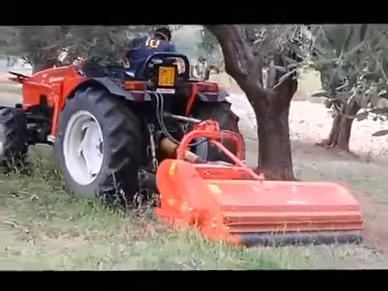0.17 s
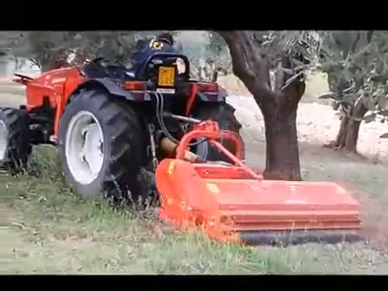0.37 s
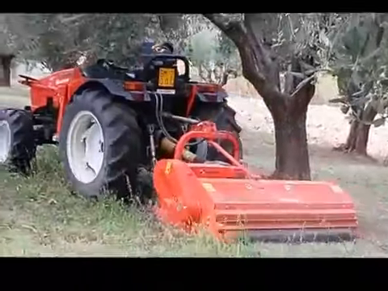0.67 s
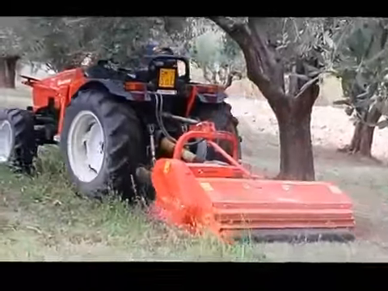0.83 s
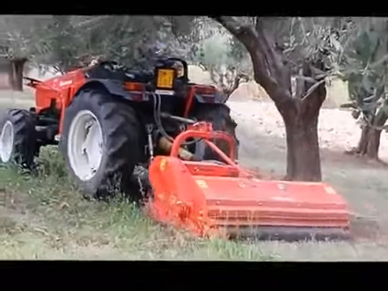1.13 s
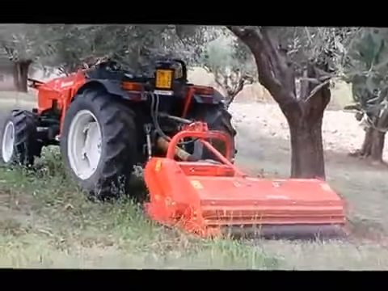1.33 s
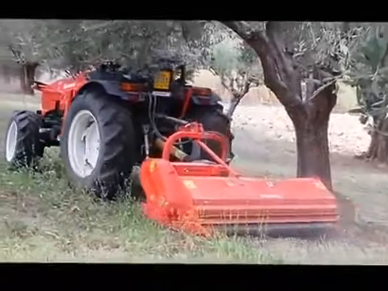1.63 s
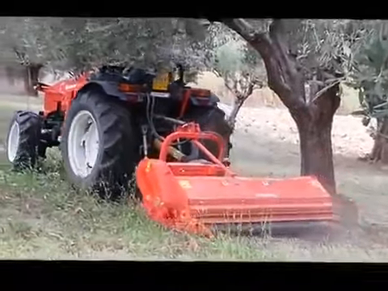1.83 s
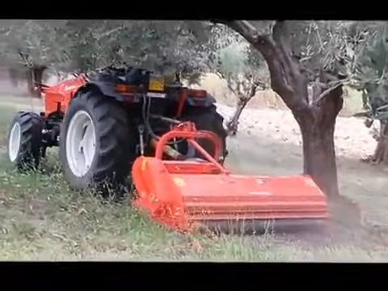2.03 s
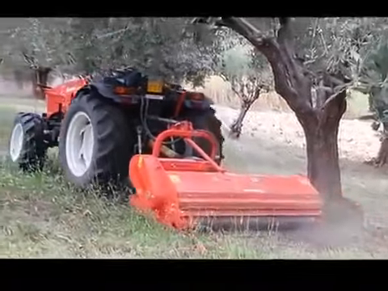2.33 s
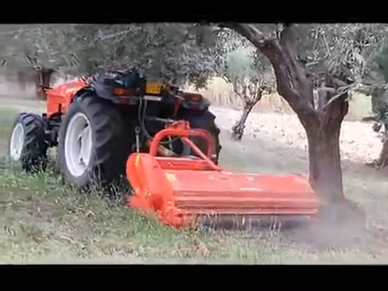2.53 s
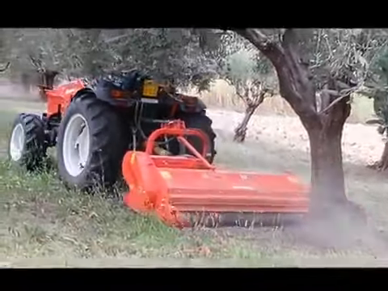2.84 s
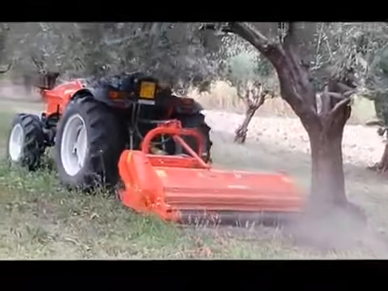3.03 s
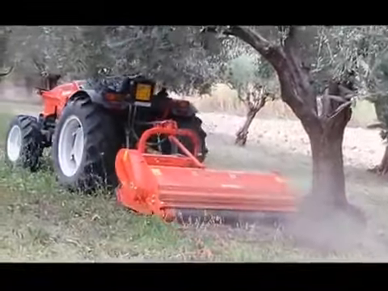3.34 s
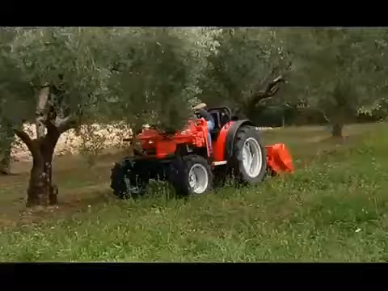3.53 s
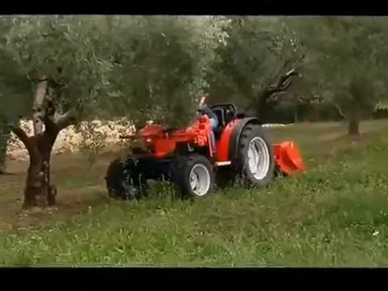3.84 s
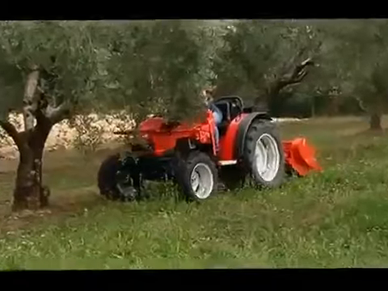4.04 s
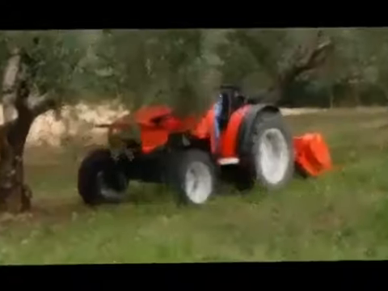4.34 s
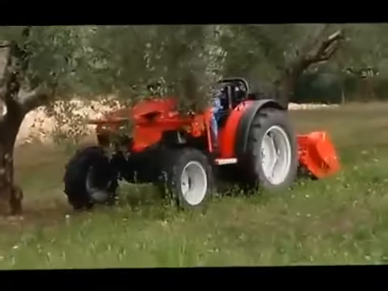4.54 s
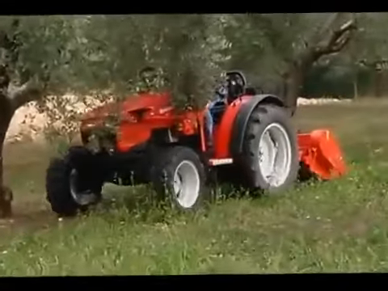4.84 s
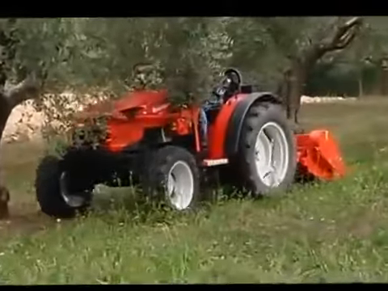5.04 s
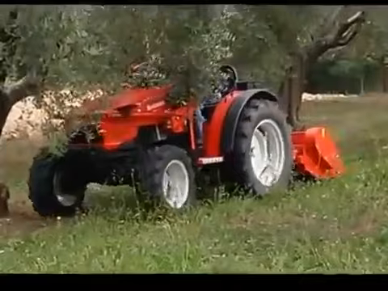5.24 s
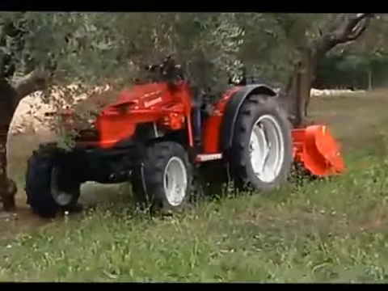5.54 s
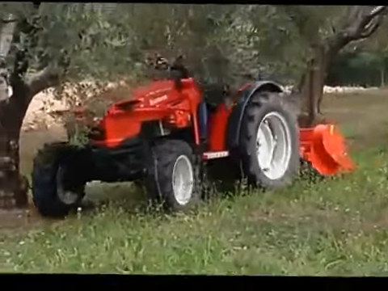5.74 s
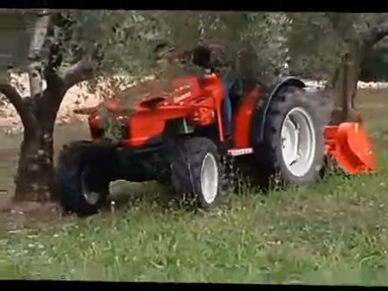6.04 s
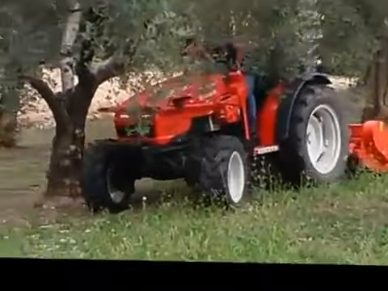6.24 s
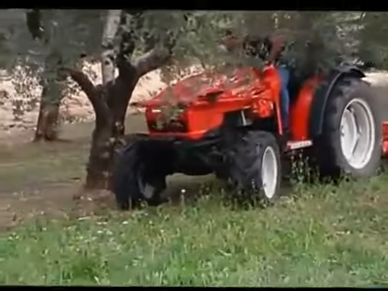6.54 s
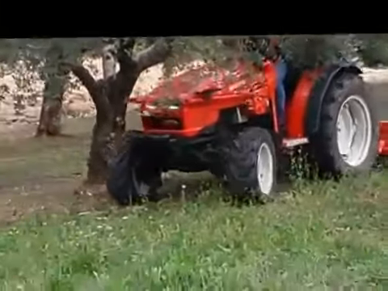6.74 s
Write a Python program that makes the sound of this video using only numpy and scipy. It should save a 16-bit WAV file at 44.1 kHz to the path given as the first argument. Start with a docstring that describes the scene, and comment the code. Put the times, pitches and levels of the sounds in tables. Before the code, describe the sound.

A flail mulcher works close by outdoors, pulled by a compact diesel tractor. From the start, grass and stalks shred in a rough, crackling hiss, with twigs snapping and chopped bits pattering against the steel hood. Underneath run a steady engine drone, a rotor hum and a fluttering gear whine. The shredding peaks around 2.5 seconds with a dull thump of earth and a sharp twig crack, then the whole sound sinks around 3 seconds and partly recovers. At 3.7 seconds it cuts to silence. At about 4.5 seconds the tractor is heard from the front: the diesel is nearest, droning and knocking at an even speed, with the mulcher a pulsing hiss behind it. It grows slightly louder as it approaches. Two small twigs snap near 5.3 seconds, and at about 6.8 seconds a dry branch cracks and splinters.

```python
"""Tractor and flail mulcher in an olive grove

A compact diesel pulls the mulcher through grass, heard from behind, then, after a short silence,
from the front. The four-cylinder engine drones and knocks, the rotor hums, its gears whine.
The flails shred stalks and fling the bits against the steel hood. Near 3 s the whole sound
sinks for a moment. A dry branch splinters at the end."""
import sys
import numpy as np
from scipy import signal
from scipy.fft import rfft, irfft, next_fast_len
from scipy.io import wavfile

SR = 44100
rng = np.random.default_rng(int(sys.argv[2]) if len(sys.argv) > 2 else 0)


def waveform_to_disk(signal):
    """Save audio, clipped to [-1, 1], as 16-bit WAV at the path in sys.argv[1]."""
    frames = np.transpose(np.atleast_2d(signal))
    scaled = np.clip(frames, -1, 1) * 32767
    samples = np.round(scaled).astype(np.int16)
    wavfile.write(sys.argv[1], SR, samples)


N = 303849
TIME = np.arange(N) / SR
REAR_END_S, FRONT_START_S = 3.718, 4.466
TEETH_PER_FIRING, ROTOR_BEATS_PER_FIRING = 3.538, 1.68
BURST_ATTACK_S = 0.0081

# engine speed (time [s], firing rate [Hz])
FRONT_FIRING_RATE = [(4.5, 58.38), (5.4, 58.33), (5.8, 58.17), (6.3, 58.24), (6.6, 58.45)]
# engine and driveline loudness (time [s], level [dB])
REAR_DRONE_LEVEL = [(0, -30.5), (.2, -29.5), (.57, -29.5), (.79, -26), (.84, -30.5), (1.9, -27),
                    (2.5, -27.5), (2.57, -33.5), (2.98, -39.5), (3.33, -40.5), (3.7, -34.5)]
# exhaust tones; quarter orders from unequal cylinders (multiple of firing rate, level [dB])
REAR_EXHAUST_ORDERS = [(0.998, -6.5), (2, -4), (3, -12), (4, -26), (4.25, -16), (5, -20)]
FRONT_EXHAUST_ORDERS = [(1, -3), (1.5, -23), (2.001, -5.5), (3, -26), (3.5, -19.5), (4.001, -15),
                        (4.249, -28)]
# gear whine (multiple of tooth rate, level [dB], roughness [0-1])
REAR_GEAR_ORDERS = [(3, -13, .7), (5, -13.5, .35), (6, -17, 1), (7, -19.5, 0.9), (8, -23, .7)]
FRONT_GEAR_ORDERS = [(3, -11.5, 0.68), (7, -18, .8), (10, -20, 0.79)]
# shredding loudness (time [s], level [dB])
SHREDDING_LEVEL = [(0, -33), (.17, -29.5), (.4, -23), (.6, -27), (.9, -23), (1.13, -21), (1.36, -21.5),
                   (1.66, -27), (1.73, -23), (1.93, -25), (2.15, -19), (2.35, -21.5), (2.5, -18.5),
                   (2.548, -22.5), (2.58, -21), (2.66, -23), (2.73, -28.5), (2.92, -35), (3.35, -39),
                   (3.5, -31.5), (3.64, -34.5), (3.71, -27)]

# source spectra (frequency [Hz], level [dB])
PUFF_SPECTRUM = [(20, -28.5), (50, -12.5), (85, 0.5), (130, -0.5), (240, -1.5), (300, -6), (380, -11.5),
                 (450, -19.5), (530, -15), (700, -11.5), (1500, -52.5)]
REAR_STALK_SPECTRUM = [(200, -21.5), (450, -12.5), (900, -24.5), (1880, -24.5), (2900, -9.5), (3440, -11),
                       (4170, -4), (5800, -9), (8120, -1.5), (9300, -10.5), (11100, -12), (13200, -19),
                       (14000, -20.5), (14600, -38), (15000, -37)]
FRONT_STALK_SPECTRUM = [(2060, -51), (3500, -39), (3770, -13), (4360, -9), (5530, -2.5), (6200, -0.5),
                        (6800, -2.5), (7870, -0.5), (8510, -4.5), (9560, -5.5), (11000, -15), (12700, -18),
                        (14100, -34), (14600, -68), (15000, -52)]
HOOD_SPECTRUM = [(300, -14), (390, -10), (450, -24), (530, -13.5), (600, -5.5), (700, -1.5), (830, -3.5),
                 (950, -5), (1130, -5.5), (1400, -2.5), (1650, -3), (1850, -3.5), (2200, -1.5), (3000, -6),
                 (3800, -18.5), (6000, -29)]
LUMP_SPECTRUM = [(200, -16.5), (450, -7.5), (700, 0.5), (1400, 0.5), (2500, -13.5), (5000, -33.5)]
BLOCK_SPECTRUM = [(300, -22), (420, -8), (600, -2), (720, -12), (840, 1), (930, -2.5), (1200, 3.5),
                  (1480, -2.5), (1680, 1.5), (2000, 1.5), (2400, -0.5), (3000, -3), (3800, -14),
                  (6000, -63)]
BRANCH_SPECTRUM = [(400, -27), (800, -7), (2300, -8), (3300, -1), (3900, -14), (4700, -8), (5700, 7),
                   (6300, 1.5), (7100, 5.5), (8500, -13), (12000, -19), (15000, -47)]
# hood panel and engine block resonances (frequency [Hz], half width [Hz], level [dB])
PANEL_RESONANCES = [(710, 25, -14.5), (825, 30, -14.5), (1405, 32, -19), (1607, 28, -14.5),
                    (2107, 190, -10.5), (2720, 160, -13)]
BLOCK_RESONANCES = [(719, 32, -8.5), (808, 48, -12), (1453, 69, -12.5), (1840, 160, -15),
                    (2040, 120, -16.5)]

# sticks and clods on the hood (time [s], level [dB])
CLOD_HITS = [(.24, -30.5), (.332, -26), (0.839, -25), (1.057, -24.5), (2.497, -25.5), (2.67, -31),
             (2.828, -30.5), (2.952, -30.5), (3.54, -52), (3.695, -44)]
# torn tufts (time [s], level [dB], centre [Hz], length [s])
TUFT_BURSTS = [(0.236, -21, 8190, 0.031), (0.33, -14, 4620, 0.019), (0.343, -17.5, 8200, 0.038),
               (0.406, -22.5, 7900, 0.031), (0.469, -19, 8200, 0.018), (0.489, -21, 8200, 0.032),
               (0.638, -24, 8200, 0.039), (0.68, -22, 7900, 0.034), (0.818, -20, 7600, 0.038),
               (0.843, -21, 6000, 0.049), (0.916, -20, 7800, 0.027), (1.043, -13, 4400, 0.02),
               (1.058, -17.5, 7600, 0.041), (1.155, -33, 7900, 0.015), (1.407, -17, 6470, 0.037),
               (1.601, -17.5, 4850, 0.031), (1.864, -23.5, 8000, 0.04), (1.947, -18.5, 4800, 0.027),
               (2.019, -21, 5000, 0.04), (2.065, -22, 7960, 0.035), (2.121, -21, 8200, 0.055),
               (2.191, -19, 7800, 0.021), (2.239, -16.5, 5000, 0.036), (2.269, -24.5, 5600, 0.034),
               (2.401, -21, 7410, 0.037), (2.453, -17, 4970, 0.025), (2.616, -21, 5000, 0.023),
               (2.671, -20.5, 5030, 0.019), (2.817, -22, 7140, 0.044), (2.936, -25.5, 4000, 0.019),
               (2.956, -28.5, 4560, 0.032), (3.034, -28.5, 9250, 0.033), (3.415, -29.5, 8480, 0.054),
               (3.698, -16.5, 7200, 0.019)]
# twigs (time [s], level [dB], centre [Hz], t60 [s], crack gain, left minus right [dB])
TWIG_SNAPS = [(0.237, -19, 4930, 0.047, .2, 5), (0.3313, -15, 4540, 0.031, 0.72, 4),
              (.496, -11.5, 8000, .035, .3, -4), (.848, -21, 6000, .025, .6, -2),
              (1.433, -19, 5000, 0.023, .4, 6), (1.616, -29, 4660, 0.029, .5, -1),
              (2.231, -13, 4400, 0.034, .3, 9), (2.275, -15.5, 5530, .035, .6, 6),
              (2.556, -8.5, 4900, .06, .7, 4.5), (2.622, -18, 5060, .03, .5, 9),
              (2.675, -24, 5000, .035, 0.55, 7), (2.834, -20.5, 5170, 0.082, .3, 8),
              (2.961, -23, 4600, 0.038, .5, 5), (3.108, -34, 6040, .03, .5, 5),
              (3.544, -39, 4500, .05, .5, 0), (5.248, -20, 6000, 0.024, .2, 1),
              (5.336, -21, 8200, .025, .3, -11)]
# grit on steel (time [s], frequency [Hz], level [dB], t60 [s])
GRIT_PINGS = [(1.503, 7520, -18, 0.12), (1.517, 7030, -20, .15), (3.545, 1960, -24, 0.17),
              (3.545, 2760, -36, 0.12), (3.545, 4530, -27.5, 0.2), (3.545, 5570, -30.5, 0.17)]

# ring of a cylinder's knock (frequency [Hz], level [dB], t60 [s])
KNOCK_RINGS = [(1365, -19.5, 0.042), (1487, -16, 0.033), (1883, -11, 0.032), (2033, -11.5, 0.063),
               (2286, -17, 0.051)]
# knock per cylinder, in firing order (level [dB])
CYLINDER_DB = [0, -7.5, -5, -6]
# accented knocks of the first cylinder (time [s], level above usual [dB])
KNOCK_ACCENTS = [(4.577, 7), (4.645, 5), (4.785, 9), (5.194, 2), (5.334, 5), (5.402, -1), (5.538, 4),
                 (5.677, 8), (5.814, 7), (6.02, 5.5), (6.089, 7), (6.225, 5.5), (6.434, 8), (6.499, 4),
                 (6.57, 6)]

# stereo width (frequency [Hz], side minus mid [dB])
REAR_SIDE = [(100, -11), (400, -8.5), (1200, -5.5), (2200, -8), (3400, 3), (4500, -0.5), (5600, 0.5),
             (8000, 1), (14000, -1)]
FRONT_SIDE = [(100, -23), (700, -8.5), (2700, -20.5), (3500, 1), (5000, 0), (14000, 0)]
# stereo balance (frequency [Hz], left minus right [dB])
REAR_BALANCE = [(1800, 0), (3200, -5), (4100, 3.5), (5000, 6), (6200, 8), (7000, -4), (8000, -5.5),
                (9700, -7.5), (11000, -8.5), (13000, -9), (14500, -2.5)]
FRONT_BALANCE = [(3600, -1), (4400, 9.5), (5000, 7), (6200, 6), (6900, 0.5), (7700, -18.5), (8200, -16),
                 (10200, -4), (11000, -8.5), (13000, -23.5)]


def from_db(db):
    """Decibels to gain."""
    return 10 ** (np.asarray(db) / 20)


def unit_rms(x):
    """Scale to rms 1."""
    return x / np.sqrt(np.mean(x ** 2) + 1e-20)


def since(start_s):
    """Seconds since start_s, zero before."""
    return np.maximum(TIME - start_s, 0)


def curve(points):
    """A (time, value) table at every sample."""
    return np.interp(TIME, *np.transpose(points))


def colour(x, spectrum):
    """Filter by a (frequency, level) table."""
    size = next_fast_len(N, True)
    hz, db = np.transpose(spectrum)
    bins_hz = np.maximum(np.arange(size // 2 + 1) * SR / size, 1)
    gain = from_db(np.interp(np.log(bins_hz), np.log(hz), db))
    return irfft(rfft(x, size) * gain, size)[..., :N]


def drift(rate_hz):
    """Slow random wander, rms 1."""
    hop = 40
    pole = np.exp(-2 * np.pi * hop * rate_hz / SR)
    noise = rng.standard_normal(N // hop + 2002)
    slow = signal.lfilter([1], [1, -2 * pole, pole * pole], noise)[2000:]
    return np.interp(np.arange(N) / hop, np.arange(len(slow)), unit_rms(slow))


def grains(per_s, spread_db):
    """Two streams of random, uneven clicks, rms 1."""
    onsets = rng.random((2, N)) < per_s / SR
    sizes = from_db(spread_db * np.minimum(rng.exponential(1, (2, N)), 5))
    return unit_rms(onsets * sizes * rng.choice([-1, 1], (2, N)))


def to_stereo(pair, spectrum, width, balance):
    """Colour two streams as mid and side; return left and right, mid rms 1."""
    mid, side = colour(pair, spectrum)
    side = colour(side, width)
    left = colour(mid + side, [(hz, db / 2) for hz, db in balance])
    right = colour(mid - side, [(hz, -db / 2) for hz, db in balance])
    return np.array([left, right]) / np.std((left + right) / 2)


def strokes(cycles, decay_cycles, uneven_db, depth):
    """Gain that jumps unevenly once a cycle, then decays; rms 1."""
    strength = from_db(uneven_db * rng.standard_normal(2048))[cycles.astype(int) % 2048]
    return unit_rms(1 + depth * strength * np.exp(-(cycles % 1) / decay_cycles))


def tones(cycles, orders, waver_hz, slip_rad):
    """Orders of a rotation, wavering in level and phase; higher ones lag."""
    out = 0
    for order, db in orders:
        gain = from_db(db + drift(waver_hz))
        phase = 2 * np.pi * order * cycles - 0.3456 * (order - 1) ** 2
        out = out + gain * np.cos(phase + slip_rad * drift(waver_hz))
    return out


def resonance(push, hz, half_width_hz):
    """Band-pass response to a push, rms 1."""
    band = signal.butter(2, [hz - half_width_hz, hz + half_width_hz], "band", fs=SR, output="sos")
    return unit_rms(signal.sosfilt(band, push))


def ring(clicks, hz, t60_s):
    """Each click starts a decaying sine."""
    r, w = from_db(-60 / (t60_s * SR)), 2 * np.pi * hz / SR
    return signal.lfilter([0, np.sin(w)], [1, -2 * r * np.cos(w), r * r], clicks + 1e-18)


def crank(firing_hz, zero_s):
    """Firing count from zero_s; the governor hunts slightly."""
    count = np.cumsum(firing_hz + .05 * drift(1.45)) / SR
    return count - count[int(zero_s * SR)]


def exhaust(firings, orders, stereo):
    """Pipe tones plus a turbulent puff per firing."""
    drone = np.sqrt(2) * tones(firings, orders, waver_hz=7, slip_rad=.04)
    puffs = rng.standard_normal((2, N)) * strokes(firings, decay_cycles=0.59, uneven_db=3, depth=1.8)
    return drone + from_db(-8) * to_stereo(puffs, PUFF_SPECTRUM, *stereo)


def driveline(firings, gears, rotor_db):
    """Flail rows beat the air, gear teeth mesh; tooth play makes the whine flutter."""
    hum = tones(firings * ROTOR_BEATS_PER_FIRING, [(1, 0.5), (2, -18)], waver_hz=10, slip_rad=0.091)
    whine = 0
    for order, db, rough in gears:
        flutter = (drift(9) + 1j * drift(9)) / np.sqrt(2)
        mesh = np.exp(2j * np.pi * order * TEETH_PER_FIRING * firings)
        whine = whine + from_db(db) * np.real((np.sqrt(1 - rough ** 2) + rough * flutter) * mesh)
    return np.sqrt(2) * (from_db(rotor_db) * hum + whine * (1 + 0.28 * drift(32)))


def breeze():
    """Faint low rumble of air."""
    spectrum = [(10, -10), (25, -2), (90, -9.5), (300, -20.5), (1000, -53)]
    return from_db(-28.5) * unit_rms(colour(rng.standard_normal((2, N)), spectrum))


def woody_stems(per_s=300, decay_s=0.012, bands=14):
    """Stems crunch at random moments, each a short burst in one band; rms 1."""
    out = 0
    for hz in np.geomspace(2502, 10120, bands):
        bites = rng.random(N) < per_s / bands / SR
        force = signal.lfilter([1], [1, -np.exp(-1 / (decay_s * SR))], bites + 1e-18)
        out = out + np.sqrt(hz) * resonance(force * rng.standard_normal((2, N)), hz, 0.13 * hz)
    return unit_rms(out)


def cracks(per_s, low_hz, high_hz, t60_s, pitches=30):
    """Lone snaps, each ringing at one pitch; two streams, rms 1."""
    clicks = grains(per_s, spread_db=1)
    pitch_index = rng.integers(0, pitches, N)
    return unit_rms(sum(np.sqrt(hz) * ring(clicks * (pitch_index == k), hz, t60_s)
                        for k, hz in enumerate(np.geomspace(low_hz, high_hz, pitches))))


def stalks(beats, spectrum, stereo, clump_db, chop, woody=0):
    """Flails snap stalks by the thousand, in clumps; thick ones crack with a pitch."""
    snaps = grains(7600, spread_db=1) + 1.4 * rng.standard_normal((2, N))
    thick = cracks(per_s=1100, low_hz=3800, high_hz=11000, t60_s=0.036)
    clumps = from_db(clump_db * drift(20))
    sweeps = strokes(beats, decay_cycles=0.3, uneven_db=2.5, depth=chop)
    return to_stereo((snaps + .5 * thick + woody) * clumps * sweeps, spectrum, *stereo)


def hail_gain(shredding_db, drone_db, clod_rise_s=0.014):
    """Hail on the hood follows the shredding and drone levels; each clod adds a swell."""
    rear = TIME < REAR_END_S
    shredding_swing_db = shredding_db - shredding_db[rear].mean()
    drone_swing_db = drone_db - drone_db[rear].mean()
    power = from_db(-31 + 0.74 * shredding_swing_db + 0.29 * drone_swing_db) ** 2
    for start_s, db in CLOD_HITS:
        rise = np.minimum(since(start_s) / clod_rise_s, 20)
        power = power + (from_db(db) * rise * np.exp(1 - rise)) ** 2
    return np.sqrt(power)


def hood(firings, stereo):
    """Chopped bits hail on the steel, surging with the engine's beat; the panels ring."""
    hail = grains(5000, spread_db=3) + .5 * rng.standard_normal((2, N))
    hail += 0.45 * cracks(per_s=700, low_hz=896.6, high_hz=3585, t60_s=0.1)
    surge = from_db(drift(14)) * strokes(firings, decay_cycles=0.33, uneven_db=8.5, depth=0.21)
    panels = 0
    for hz, half_width_hz, db in PANEL_RESONANCES:
        gain = from_db(db + 2.54 * drift(17))
        panels = panels + gain * resonance(grains(1500, spread_db=1.5)[0], hz, half_width_hz)
    return from_db(-1) * to_stereo(hail * surge, HOOD_SPECTRUM, *stereo) + panels


def burst(age_s, length_s):
    """Envelope: fast rise, Gaussian fall."""
    return (1 - np.exp(-age_s / BURST_ATTACK_S)) * np.exp(-(age_s / length_s) ** 2)


def tufts(shredding):
    """Each tuft tears in a burst of snaps with its own pitch region."""
    out = np.zeros((2, N))
    for start_s, db, hz, length_s in TUFT_BURSTS:
        span = slice(int(start_s * SR), int((start_s + .2) * SR))
        tear = shredding[:, span] * burst(TIME[span] - TIME[span][0], length_s)
        pitched = signal.lfilter(*signal.iirpeak(hz, Q=3.5, fs=SR), tear)
        out[:, span] += from_db(db) * (tear + 0.81 * pitched)
    return out


def twigs(crack_s=0.001):
    """Hard twigs break: a dry crack, then a short bright run of splinters."""
    out = np.zeros((2, N))
    splinters = grains(10000, spread_db=1)
    for start_s, db, hz, t60_s, crack, pan_db in TWIG_SNAPS:
        age_s = np.arange(int(t60_s * SR)) / SR
        span = slice(int(start_s * SR), int(start_s * SR) + len(age_s))
        fall = from_db(-60 * age_s / t60_s) + crack * np.exp(-age_s / crack_s)
        snap = resonance(splinters[:, span], hz, 740) + 0.44 * resonance(splinters[:, span], 7000, 4300)
        out[:, span] += from_db([[db + pan_db / 2], [db - pan_db / 2]]) * fall * snap
    return out


def grit():
    """Grit leaves short rings in the steel."""
    out = np.zeros(N)
    for start_s, hz, db, t60_s in GRIT_PINGS:
        age_s = since(start_s)
        fall = from_db(db - 60 * np.minimum(age_s / t60_s, 2))
        out += fall * np.sin(2 * np.pi * hz * age_s) * (1 + 0.22 * drift(110))
    return out


def earth_lump(stereo, start_s=2.502):
    """A lump of earth bursts inside the hood: a dull, rough thump."""
    force = from_db(-19) * burst(since(start_s), length_s=0.027)
    return force * to_stereo(grains(2800, spread_db=-3.5), LUMP_SPECTRUM, *stereo)


def from_behind():
    """Mulcher nearest: shredding covers the engine."""
    stereo = REAR_SIDE, REAR_BALANCE
    firings = crank(firing_hz=57.05, zero_s=.0066)
    shredding_db, drone_db = curve(SHREDDING_LEVEL), curve(REAR_DRONE_LEVEL)
    drone = exhaust(firings, REAR_EXHAUST_ORDERS, stereo)
    drone += driveline(firings, REAR_GEAR_ORDERS, rotor_db=-6.5) + breeze()
    stems, dry_snaps = woody_stems(), grains(110, spread_db=0)
    cutting = stalks(firings * ROTOR_BEATS_PER_FIRING, REAR_STALK_SPECTRUM, stereo,
                     clump_db=0.05, chop=0.18, woody=0.95 * stems + 0.55 * dry_snaps)
    tearing = stalks(firings, REAR_STALK_SPECTRUM, stereo,
                     clump_db=0.6, chop=0.15, woody=0.35 * (stems + dry_snaps)[::-1])
    hail = hail_gain(shredding_db, drone_db) * hood(firings, stereo)
    return (from_db(drone_db) * drone + from_db(shredding_db) * cutting
            + hail + tufts(tearing) + earth_lump(stereo))


def block_thud(firings, stereo):
    """Combustion shakes the block once a firing; each blow stirs its resonances differently."""
    ticks = rng.standard_normal((2, N)) + 0.43 * grains(2500, spread_db=0.5)
    blows = strokes(firings, decay_cycles=0.32, uneven_db=2.5, depth=0.18)
    out = from_db(-2) * to_stereo(ticks * blows, BLOCK_SPECTRUM, *stereo)
    for hz, half_width_hz, db in BLOCK_RESONANCES:
        push = rng.standard_normal(N) * strokes(firings, decay_cycles=0.35, uneven_db=0.5, depth=1.5)
        out += from_db(db + 1.8 * drift(5.9)) * resonance(push, hz, half_width_hz)
    return out


def cylinder_knock(firings, slap_lag_firings=0.36, uneven_db=3.5):
    """Each cylinder strikes the block twice in quick succession; the first cylinder hits hardest."""
    jittered = firings + .008 * drift(20)
    hits = sum(np.diff(np.floor(jittered - lag), prepend=0) == 1 for lag in (0, slap_lag_firings))
    cylinder = np.floor(jittered).astype(int) % 4
    accent_db = sum(db * (np.abs(firings - firings[int(s * SR)]) < 2) for s, db in KNOCK_ACCENTS)
    hit_db = np.array(CYLINDER_DB)[cylinder] + accent_db * (cylinder == 0) + uneven_db * drift(6.2)
    out = 0
    for hz, db, t60_s in KNOCK_RINGS:
        blows = hits * from_db(hit_db + 1.2 * drift(30)) * rng.choice([-1, 1], N)
        out = out + from_db(db) * unit_rms(ring(blows, hz, t60_s))
    return out


def branch(stereo, start_s=6.846):
    """A dry branch splinters under the flails: a crack, then uneven crunching."""
    age_s = since(start_s)
    crack = (1 - np.exp(-age_s / 0.0013)) * (1 + 1.3 * np.exp(-age_s / 0.011))
    force = crack * from_db(-19.5 + 0.65 * drift(102))
    return force * to_stereo(grains(9000, spread_db=3.5), BRANCH_SPECTRUM, *stereo)


def nearing(start_db, db_per_s):
    """Gain rising as the tractor drives up."""
    return from_db(start_db + db_per_s * since(FRONT_START_S))


def from_front():
    """Engine nearest: it knocks, the mulcher hisses behind it."""
    stereo = FRONT_SIDE, FRONT_BALANCE
    firings = crank(curve(FRONT_FIRING_RATE), zero_s=4.579)
    ignitions = firings + .37   # knock leads the exhaust puff
    drone = exhaust(firings, FRONT_EXHAUST_ORDERS, stereo)
    drone += driveline(firings, FRONT_GEAR_ORDERS, rotor_db=-12.5) + breeze()
    cutting = stalks(ignitions, FRONT_STALK_SPECTRUM, stereo, clump_db=.5, chop=0.75)
    knock = block_thud(ignitions, stereo) + cylinder_knock(ignitions)
    return (nearing(-28.5, db_per_s=0.48) * drone + nearing(-29.5, db_per_s=0.19) * knock
            + nearing(-30, db_per_s=1) * cutting + branch((FRONT_SIDE, REAR_BALANCE)))


def scene(fade_out_s=0.0057, fade_in_s=0.028):
    """Rear view, short silence, front view; twigs snap in both."""
    rear_gain = np.exp(-np.minimum(since(REAR_END_S) / fade_out_s, 20))
    front_gain = (1 - np.exp(-since(FRONT_START_S) / fade_in_s)) ** 2
    return rear_gain * (from_behind() + grit()) + front_gain * from_front() + twigs()


def record(dry):
    """Soft clip, then a steep low-pass."""
    ceiling, cutoff_hz = 1.15, 14800
    rounded = ceiling * np.tanh(dry / ceiling)
    return signal.sosfilt(signal.ellip(10, .2, 90, cutoff_hz, fs=SR, output="sos"), rounded)


dry = scene()
out = record(dry)
waveform_to_disk(out)
```